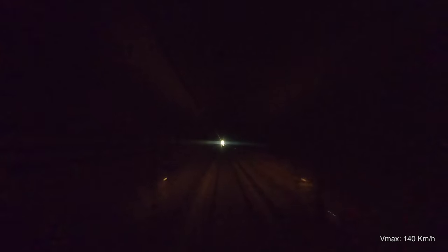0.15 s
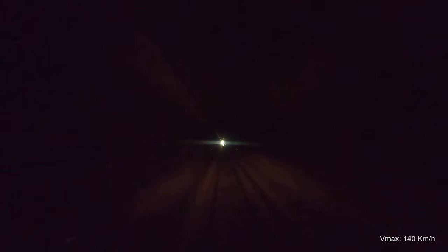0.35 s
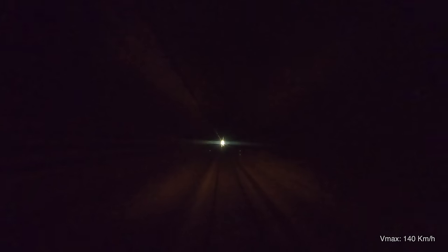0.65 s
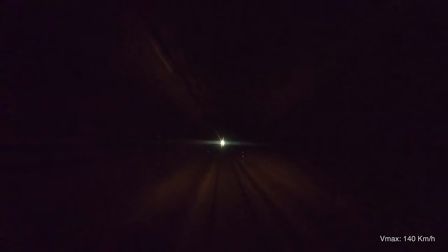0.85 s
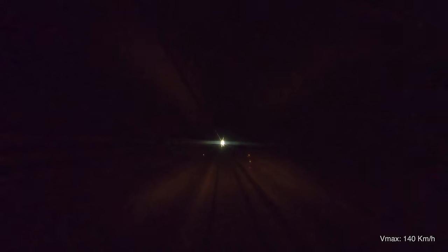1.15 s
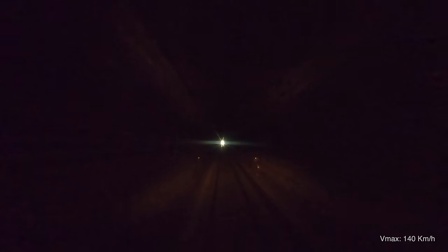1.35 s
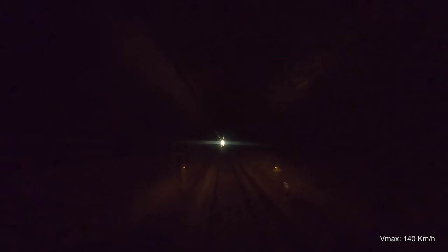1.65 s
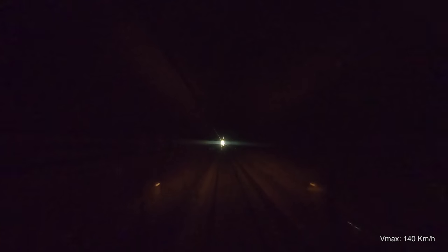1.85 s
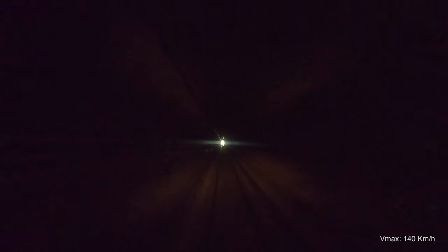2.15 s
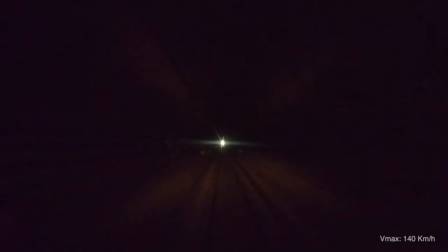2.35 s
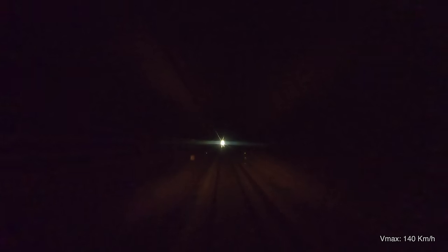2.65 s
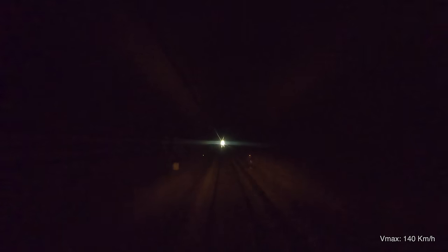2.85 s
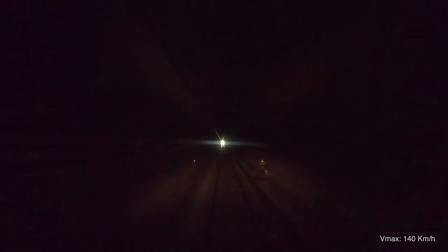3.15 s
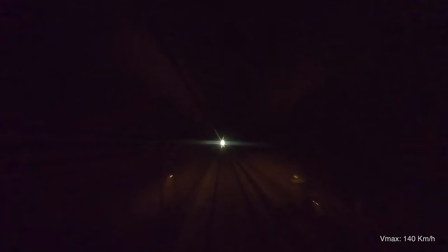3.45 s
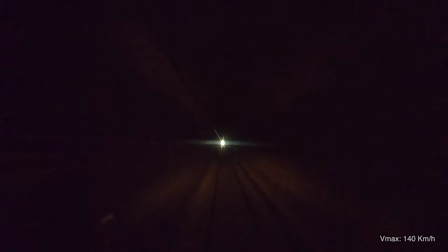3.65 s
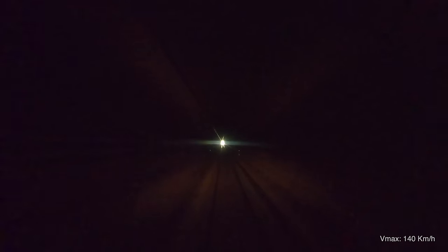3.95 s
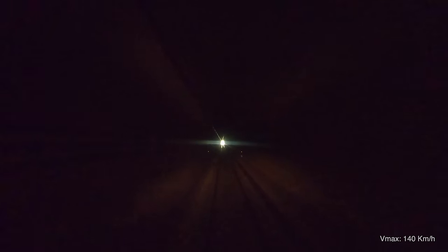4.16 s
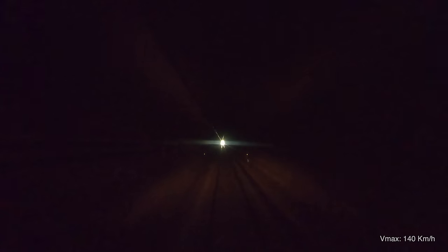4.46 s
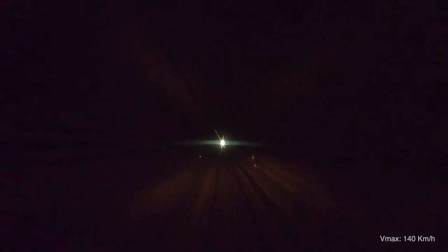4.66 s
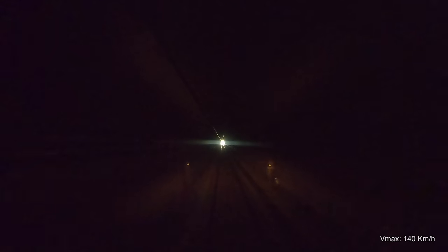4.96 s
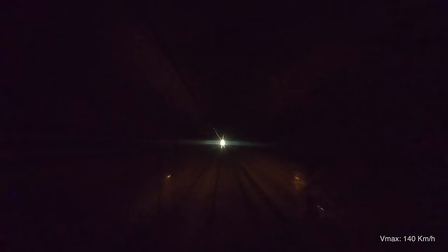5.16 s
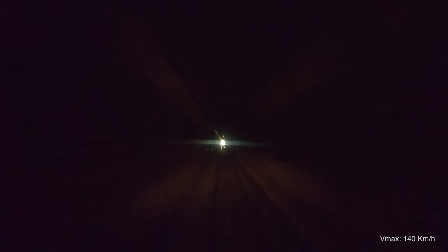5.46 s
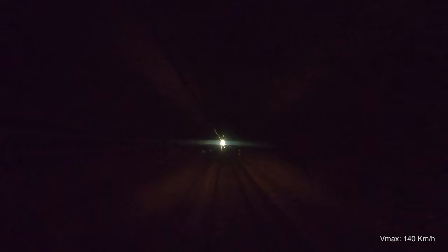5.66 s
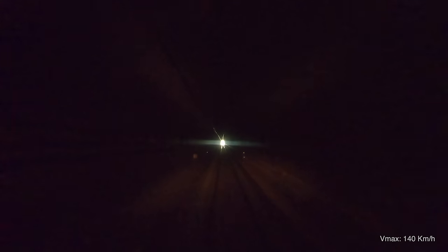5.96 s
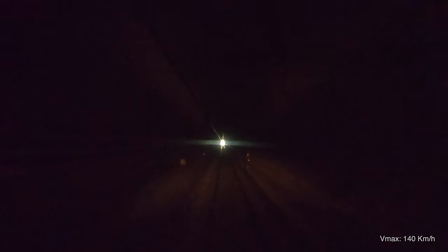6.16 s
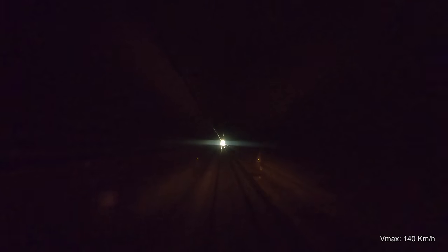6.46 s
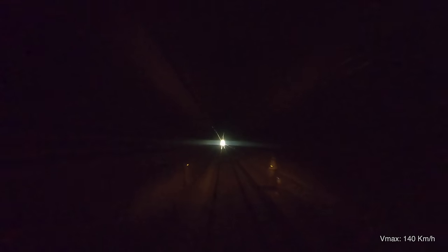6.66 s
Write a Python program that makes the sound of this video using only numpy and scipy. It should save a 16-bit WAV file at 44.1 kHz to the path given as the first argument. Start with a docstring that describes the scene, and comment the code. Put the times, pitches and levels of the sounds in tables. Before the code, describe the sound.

From 0 to about 6.8 seconds, the inside of an electric train's cab is heard as it runs fast through a tunnel, slowing very slightly. A heavy, muffled wheel-and-rail rumble never stops; its deepest boom, around 75 hertz, shivers and swells irregularly, strongest near 6.2. Under it a transformer hum near 50 hertz throbs, with pulses near 0.5, 2.3, 3.1, 3.5 and 5.5. A faint wavering gear whine near 475 hertz, with its octave, blends into the roar until about 3.2, then almost disappears. Panels resonate softly, notably around 3.35 and 4.5. Low draught buffets push the left and right of the stereo microphone oppositely, clustering from 3.2 to 3.9. Very quiet seal hiss flutters, more lively at 2.7-3, 4.7-5.3 and 6-6.7. Tiny ticks fall near 2.9, 3.3, 6.0 and 6.45.

```python
"""The driver's cab of an electric train running fast through a tunnel, heard by a two-port microphone.
Wheel and rail roar is shaped noise through the floor, with narrow bands for panels and a tone for the cab's air.
The transformer hums and the gears whine as wandering sines; air at the seals rustles as fluttering hiss.
A draught pushes the two ports opposite ways, and a fitting ticks faintly as short decaying sines."""
import sys
import numpy as np
from scipy import signal
from scipy.fft import rfft, irfft, next_fast_len
from scipy.io import wavfile
from scipy.ndimage import uniform_filter1d, minimum_filter1d

SR = 44100
rng = np.random.default_rng(int(sys.argv[2]) if len(sys.argv) > 2 else 0)


def unload_audio(sound):
    """Save the sound as a 16-bit wav file, at the path given as the first command line argument."""
    columns = np.transpose(np.atleast_2d(sound))
    # keep every value between -1 and 1, then stretch to whole-number steps
    steps = np.round(np.clip(columns, -1, 1) * 32767)
    wavfile.write(sys.argv[1], SR, steps.astype(np.int16))


N = 299876  # samples, about 6.8 s


def gain_of(db):
    """Decibels to amplitude."""
    return 10 ** (np.asarray(db) / 20)


def evened(x):
    """Scales to rms 1."""
    return x / np.sqrt(np.mean(x ** 2) + 1e-20)


def read(points, hz):
    """A spectrum table read at the given frequencies, straight lines over log frequency."""
    f, value = np.transpose(points)
    return np.interp(np.log(hz + 1), np.log(f + 1), value)


def curve(rows):
    """Each column of a time table, sample by sample."""
    s, *columns = np.transpose(rows)
    return [np.interp(np.arange(N) / SR, s, column) for column in columns]


def drift(top_hz):
    """Slow chance of rms 1: sines of random phase up to the given rate."""
    t = np.arange(0, N + 64, 64) / SR
    rates = np.geomspace(top_hz / 8, top_hz, num=16)
    slow = sum(np.sin(2 * np.pi * (f * t + rng.random())) for f in rates)
    return np.interp(np.arange(N) / SR, t, evened(slow))


def wandering_angle(hz):
    """Phase in radians of a tone whose frequency follows hz."""
    return 2 * np.pi * np.cumsum(hz) / SR


def pair_noise(colour_db):
    """Noise of the given colour as the two ports hear it: less alike higher up, rms 1 over the pair."""
    # Each row: frequency in Hz, left-right likeness from 0 to 1.
    likeness = [(60, 1), (200, 1), (300, 0.97), (420, 0.89), (550, 0.9), (710, 0.91), (900, .7),
                (1310, 0.82), (2420, .62), (4480, 0.44), (9000, 0.3)]
    # Each row: frequency in Hz, left over right in dB.
    left_over_right = [(60, 0.46), (210, 0.5), (300, .5), (430, 1.7), (560, 2.5), (900, 3.1), (1310, 3.1),
                       (2420, 2.6), (3200, 3), (4480, 2), (7000, .5)]
    # Each row: frequency in Hz, lead of the left port in radians.
    left_lead = [(0, -0.17), (950, -0.085), (2500, -0.66), (3100, -1.5), (3880, 0.69), (4650, -0.97)]
    size = next_fast_len(N)
    hz = np.fft.rfftfreq(size, 1 / SR)
    a, b, c, d = rng.standard_normal((len(hz), 4)).T
    left, unlike = a + 1j * b, c + 1j * d
    same = np.clip(read(likeness, hz), -1, 1)
    right = same * left + np.sqrt(1 - same ** 2) * unlike
    right = right * np.exp(-1j * read(left_lead, hz))
    lean = gain_of(read(left_over_right, hz) / 2)
    spectra = np.array([left * lean, right / lean]) * gain_of(colour_db(hz))
    return evened(irfft(spectra, size)[:, :N])


def ripple(hz):
    """Dense small resonances of the cab: fine random peaks and dips over the upper spectrum, in dB."""
    depth_db, spacing_hz, from_hz = .9, 25, 1100
    grid = np.arange(0, SR / 2 + spacing_hz, spacing_hz)
    return depth_db * np.interp(hz, grid, rng.standard_normal(len(grid))) * (hz > from_hz)


def cab_colour(hz):
    """The roar that passes the car body, with the cab's resonances on top, in relative dB."""
    # Rolling roar through the car body. Each row: frequency in Hz, relative density in dB per Hz.
    roar = [(18, -20.5), (27, -22), (38, -15), (118, -15), (230, -19), (390, -30.5), (700, -32.5),
            (1300, -37), (2000, -43.5), (3050, -54), (3700, -57), (5300, -71), (7000, -75), (10000, -99.5),
            (15000, -115)]
    # Resonances of cab air, floor and panels. Each row: centre in Hz, width in Hz, boost in dB (minus dips).
    resonances = [(55, 10, 4.5), (73.7, 45, 6.5), (101.5, 13, 7.5), (114, 16, -1.5), (129, 7.7, 3),
                  (163.6, 28, 5), (192, 13, 5), (218, 5.5, 0), (232, 21, 1.5), (257.3, 28, 4),
                  (283, 10, 1.5), (303, 34, 2), (335.6, 26, 5.5), (448, 24, 6), (515, 60, 7),
                  (578, 36, 5.5), (596, 12, 1.5), (655, 19, 3.5), (680, 14, -3), (800, 20, 2),
                  (830, 22, -1.5), (910, 51, 3.5), (943, 33, 3.5), (996, 23, 2.5), (1180, 30, 0.5),
                  (1300, 37, 1), (3500, 420, 2.5), (4650, 500, 5), (5050, 250, 2), (8500, 600, 6.5)]
    return read(roar, hz) + sum(db / (1 + (2 * (hz - f) / w) ** 2) for f, w, db in resonances)


def rolling():
    """Wheel on rail: boom in the cab's lowest modes, floor rumble, and roar above, each with its own swells."""
    # Level of the boom. Each row: time in seconds, level in dB.
    boom_level = [(0, -19.5), (.65, -21), (1.5, -22.5), (2, -19.5), (2.4, -20), (3.1, -19.5), (3.4, -23.5),
                  (3.8, -18), (4.4, -23.5), (4.7, -20.5), (4.9, -21), (5.7, -19.5), (6.15, -20),
                  (6.4, -21.5), (6.8, -21)]
    # Level of the floor rumble. Each row: time in seconds, level in dB before its slow swell.
    rumble_level = [(0, -26), (1.7, -25), (2.9, -25), (3.35, -24.5), (4.5, -25), (5.8, -26.5), (6.8, -27)]
    # Level of the roar. Each row: time in seconds, level in dB before swell and surges.
    roar_level = [(0, -35), (1.8, -34), (3.8, -34.5), (5.2, -34.5), (6.1, -35), (6.8, -36)]
    # Brief surges of the roar. Each row: centre in seconds, length in seconds, boost in dB.
    surges = [(1.125, 0.11, 1), (1.839, .2, 1), (3.759, 0.33, 0.5)]
    boom_edge_hz, rumble_edge_hz = 125.7, 442
    rumble_swell_db, roar_swell_db = 0.45, 0.1

    def below(hz, edge):
        return 1 / (1 + (hz / edge) ** 8)

    def band(level_db, share):
        """One band of the cab's noise; share is its part of the power at each frequency."""
        def colour(hz):
            return cab_colour(hz) + ripple(hz) + 10 * np.log10(abs(share(hz)) + 1e-12)
        return gain_of(level_db) * pair_noise(colour)

    t = np.arange(N) / SR
    surge_db = sum(db * np.exp(-((t - s) / length * 2) ** 2) for s, length, db in surges)
    rumble_db = curve(rumble_level)[0] + rumble_swell_db * drift(top_hz=4)
    roar_db = curve(roar_level)[0] + roar_swell_db * drift(top_hz=6.0) + surge_db
    low = band(curve(boom_level)[0], lambda hz: below(hz, boom_edge_hz))
    rumble = band(rumble_db, lambda hz: below(hz, rumble_edge_hz) - below(hz, boom_edge_hz))
    high = band(roar_db, lambda hz: 1 - below(hz, rumble_edge_hz))
    return low + rumble + high


def panels():
    """Floor and wall panels: narrow bands of noise that swell as the track shakes each panel."""
    # Each row: centre in Hz, width in Hz.
    bands = [(164, 19), (303, 24), (800, 14)]
    # How hard each panel rings. Each row: time in seconds, low, middle and high panel in dB.
    ringing = [(0, -32, -45, -59.5), (1.1, -32, -44, -62.5), (1.35, -40, -47, -60), (1.6, -30, -34, -59),
               (1.85, -41, -45, -61), (2.3, -33, -35, -57.5), (2.6, -35.5, -43.5, -59),
               (3.1, -36, -52.5, -58), (3.35, -25, -41, -56), (3.65, -35.5, -37.5, -49),
               (4.1, -33.5, -38, -56), (4.3, -38.5, -40.5, -52.5), (4.5, -33, -30.5, -52),
               (4.7, -38.5, -35.5, -55), (4.9, -33, -36, -58), (5.2, -35.5, -43, -44),
               (5.5, -36, -39, -52.5), (5.8, -30.5, -40.5, -49), (6.2, -30.5, -40.5, -52),
               (6.8, -39, -39.5, -56)]
    return sum(gain_of(db) * pair_noise(lambda hz: -20 * np.log10(1 + (2 * (hz - f) / w) ** 2))
               for db, (f, w) in zip(curve(ringing), bands))


def boom():
    """The cab's air column, firm core of the boom: a low tone whose size and pitch shiver."""
    # Each row: time in seconds, pitch in Hz and level in dB, both before the shiver.
    core = [(0, 75, -25.5), (.23, 66.3, -35), (.45, 77.85, -24.5), (.79, 72.7, -24), (1.1, 75.14, -26),
            (1.42, 75.86, -24), (1.65, 68.4, -20.5), (1.82, 80.7, -28.5), (2.05, 72.86, -26.5),
            (2.25, 76, -33), (2.6, 72.95, -28.5), (3.05, 75.85, -22), (3.41, 75.97, -37.5),
            (3.67, 84.9, -26.5), (3.92, 66.55, -22), (4.15, 67.6, -28), (4.48, 75, -31),
            (4.64, 69.3, -21.5), (4.8, 80.7, -27), (5.04, 81.76, -36.5), (5.2, 71.6, -25), (5.59, 71, -26),
            (5.9, 79, -23), (6.19, 82.3, -16), (6.34, 66.04, -34), (6.53, 64, -25.5), (6.8, 71, -31)]
    hz, db = curve(core)
    tone = np.sin(wandering_angle(hz + 2.63 * drift(top_hz=9)))
    level = np.sqrt(2) * gain_of(db + 2.5 * drift(top_hz=14))
    return level * tone * gain_of([[.25], [-.25]])  # a little stronger at the left port


def hum():
    """The transformer's low tone, throbbing in pitch and level."""
    # Each row: time in seconds, pitch in Hz and level in dB, both before the quicker wobble.
    throb = [(0, 47.5, -23), (.21, 49.9, -30), (.5, 49, -17), (.62, 48.9, -33), (.97, 52.14, -22.5),
             (1.25, 49.9, -25), (1.52, 48.9, -22), (1.7, 47.8, -33), (2.2, 50.1, -37), (2.33, 50.83, -18.5),
             (2.65, 50.6, -34), (2.86, 50.9, -20.5), (2.95, 48.7, -31), (3.07, 50, -16), (3.31, 49.8, -36),
             (3.48, 49.1, -17.5), (3.72, 50, -29), (4.05, 50.03, -23), (4.41, 50.4, -21.5),
             (4.58, 51.9, -28), (4.71, 50.4, -20), (4.9, 49.4, -36), (5, 49.2, -21.5), (5.38, 48.7, -28),
             (5.5, 48.8, -18), (5.74, 48.8, -24), (5.95, 53, -32), (6.2, 51, -25), (6.42, 49.6, -26),
             (6.53, 51.2, -18), (6.74, 54.4, -35), (6.8, 54.5, -26)]
    hz, db = curve(throb)
    tone = np.sin(wandering_angle(hz + 1.4 * drift(top_hz=9)))
    level = np.sqrt(2) * gain_of(db + 2.3 * drift(top_hz=13))
    return level * tone * gain_of([[.3], [-.3]])


def gears():
    """Tooth mesh tone and its octave, sinking as the train slows; the octave's path to the right port shifts."""
    # Each row: time in seconds, tone in dB, octave in dB, the octave's lead at the right port in radians;
    # levels are before wobble and left-right lean, the lead before its wander.
    whine = [(0, -37, -54, .6), (.35, -38.5, -43.5, 0.61), (.7, -46, -46.5, 0.55), (.95, -49, -49.5, 0.63),
             (1.3, -41.5, -44, 1.1), (1.6, -36.5, -47, 2.16), (1.75, -38, -55, 1.42), (1.87, -42, -51, 1),
             (2.05, -39.5, -42, 0.83), (2.25, -35.5, -50.5, 0.89), (2.4, -46, -51, 1.34),
             (2.55, -38, -47, 0.83), (2.8, -38, -43, 0.31), (3.1, -37, -54, 0.72), (3.4, -55, -53, .8),
             (3.8, -53, -51.5, 1.7), (4.6, -52.5, -49.5, 2.1), (5.1, -56, -55, 1.11), (5.3, -60, -52, 0.69),
             (5.6, -61, -47.5, .8), (5.8, -53, -54.5, 0.91), (6.05, -61, -48, 1.05),
             (6.3, -53.5, -58, 0.96), (6.8, -59.5, -51.5, 0.94)]
    mesh_hz, slowing_hz_per_s, octave_wander_rad = 477.4, 1.35, 0.29
    t = np.arange(N) / SR
    mesh_db, octave_db, lead = curve(whine)
    angle = wandering_angle(mesh_hz - slowing_hz_per_s * t + 2.9 * drift(top_hz=28.04))
    tone = gain_of(mesh_db + 1.6 * drift(top_hz=24.1)) * np.sin(angle)
    lead = lead + octave_wander_rad * drift(top_hz=5.5)
    octave_level = gain_of(octave_db + 1.8 * drift(top_hz=30.1))
    octave = octave_level * np.sin([2 * angle, 2 * angle + lead])
    return np.sqrt(2) * (tone * gain_of([[2.2], [-2.4]]) + octave * gain_of([[1.6], [-1.7]]))


def rustle():
    """Air at the seals: high hiss that comes in flurries and flutters quickly."""
    # Each row: frequency in Hz, relative density in dB per Hz.
    hiss_colour = [(3500, -24.5), (5500, 2), (7000, -1), (9000, -9), (12000, -21.5), (15500, -32)]
    # Each row: start in seconds, length in seconds, boost in dB.
    flurries = [(0.379, 0.15, 3), (2.35, 0.24, 3), (2.69, .1, 5), (2.863, .12, 5), (3.172, 0.13, 3),
                (4.712, 0.21, 4), (5.027, .1, 6), (5.18, 0.16, 7), (5.95, 0.33, 6), (6.45, 0.28, 4)]
    base_db, edge_s = -73.5, .1
    t = np.arange(N) / SR
    flurry_db = np.zeros(N)
    for s, length, db in flurries:
        inside_s = np.minimum(t - s, s + length - t)
        flurry_db += db * np.clip(inside_s / edge_s + .5, 0, 1)
    flutter = evened(uniform_filter1d(rng.standard_normal(N), size=700))
    return gain_of(base_db + flurry_db + 1.4 * flutter) * pair_noise(lambda hz: read(hiss_colour, hz))


def buffet(width_ms):
    """One pressure push with a rebound on either side."""
    u = np.arange(-1000, 1000) / SR * 1000 / width_ms
    return (1 - u ** 2) * np.exp(-u ** 2 / 2)


def draught():
    """Eddies passing the ports push them opposite ways: strong and small buffets over a lumpy low wind."""
    # Each row: frequency in Hz, relative density in dB per Hz.
    wind_colour = [(15, -3.5), (50, -0.5), (120, -4.5), (250, -17), (500, -28), (1500, -63)]
    # Strongest buffets. Each row: time in seconds, peak in dB, width in ms, sign of the left port's push.
    buffets = [(.597, -24, 2.4, 1), (1.02, -22, 1.6, 1), (3.171, -23, 2.78, -1), (3.382, -23, 3.76, -1),
               (3.629, -21, 1.75, -1), (3.663, -23, 5.9, -1), (3.793, -19, 1.26, 1), (3.917, -23, 1.44, -1),
               (4.617, -25, 2.97, -1), (6.453, -25, 1.75, -1)]
    wind_db = -43.5  # before its lumps
    small_per_s, small_db, small_ms = 2.5, -25.5, 4.2  # mean rate, rms of the random peaks, width
    colour = gain_of(read(wind_colour, np.fft.rfftfreq(N, 1 / SR)))
    wind = evened(irfft(rfft(rng.standard_normal(N)) * colour, N))
    push = gain_of(wind_db + 2.6 * drift(top_hz=25.3)) * wind
    small = rng.standard_normal(N) * (rng.random(N) < small_per_s / SR)
    push += gain_of(small_db) * signal.oaconvolve(small, buffet(small_ms), "same")
    for s, db, width_ms, sign in buffets:
        push[round(s * SR) - 1000:][:2000] += np.sign(sign) * gain_of(db) * buffet(width_ms)
    return np.array([push, -push])


def ticks():
    """A small hard part of a fitting knocks and rings briefly, alike at both ports."""
    # Each row: start in seconds, starting level of the ring in dB.
    knocks = [(2.9183, -65), (3.2637, -67), (5.9644, -66), (6.4528, -73)]
    ring_hz, t60_s = 8600, .03
    out, t = np.zeros(N), np.arange(3000) / SR
    for s, db in knocks:
        out[round(s * SR):][:3000] += gain_of(db - 60 * t / t60_s) * np.sin(2 * np.pi * ring_hz * t)
    return out


def scene():
    """Everything heard in the cab."""
    return rolling() + panels() + boom() + hum() + gears() + rustle() + draught() + ticks()


def record(dry):
    """A limiter holds down the tallest swings, both ports together; then the treble is cut at the band limit."""
    limit_db, slope, edge_hz = -8, .7, 15700  # slope: dB taken off per smoothed dB over the limit
    peak = -minimum_filter1d(-abs(dry).max(axis=0), size=1500)  # running maximum
    peak_db = 20 * np.log10(peak + 1e-9)
    over_db = uniform_filter1d(np.maximum(peak_db - limit_db, 0), size=1500)
    held = dry / gain_of(slope * over_db)
    low_pass = signal.firwin(511, edge_hz, window=("kaiser", 9), fs=SR)
    return signal.oaconvolve(held, low_pass[None], "same")


dry = scene()
out = record(dry)
unload_audio(out)
```